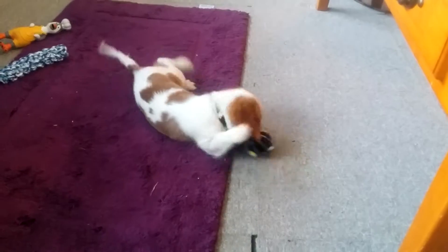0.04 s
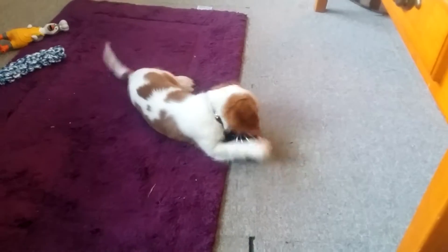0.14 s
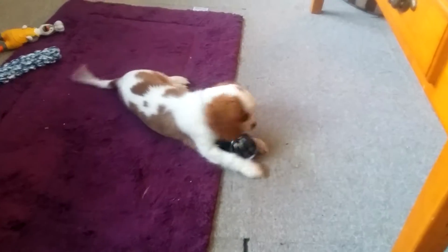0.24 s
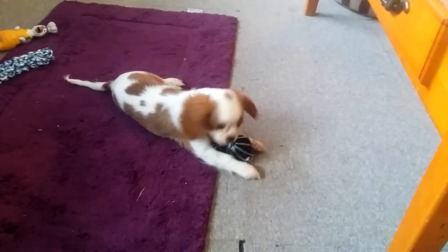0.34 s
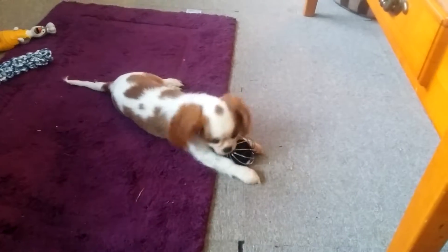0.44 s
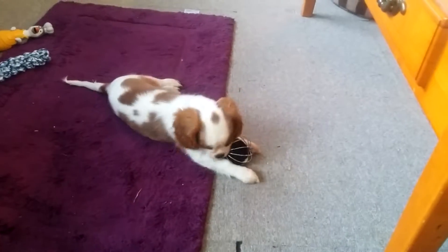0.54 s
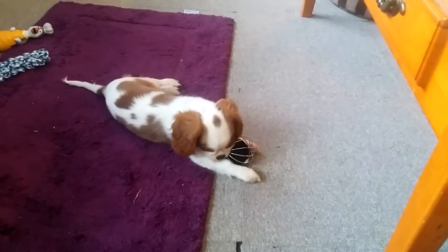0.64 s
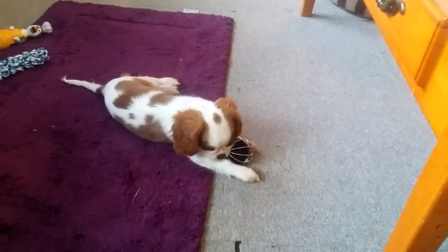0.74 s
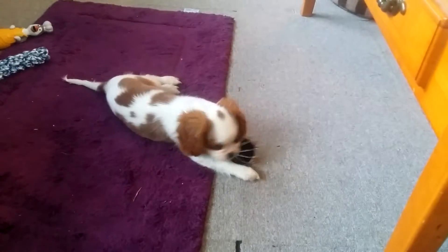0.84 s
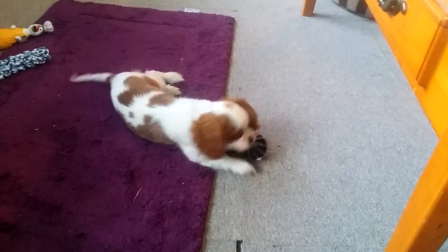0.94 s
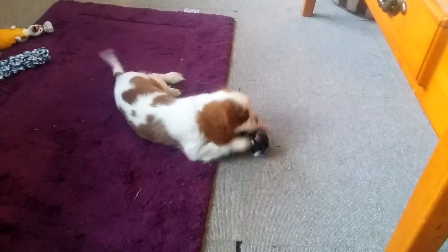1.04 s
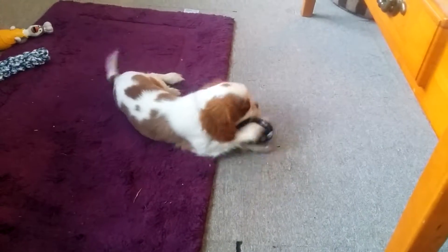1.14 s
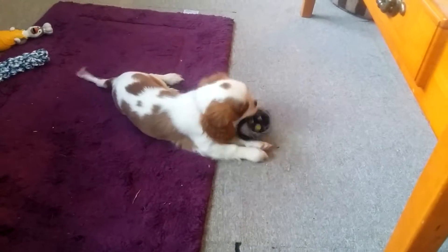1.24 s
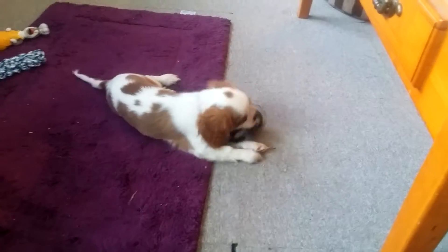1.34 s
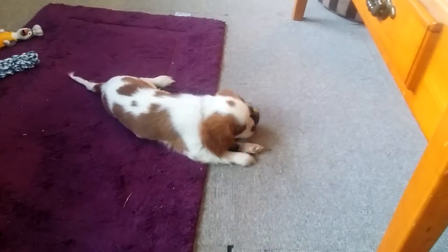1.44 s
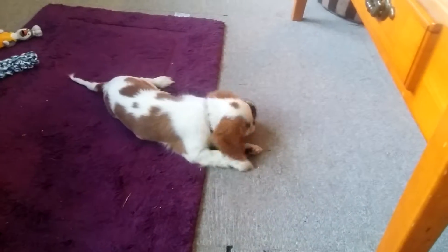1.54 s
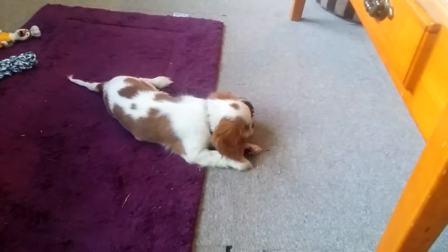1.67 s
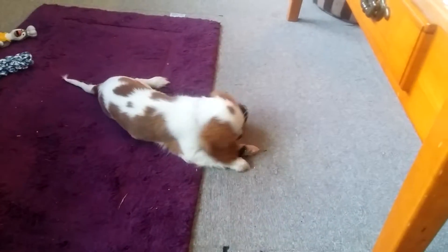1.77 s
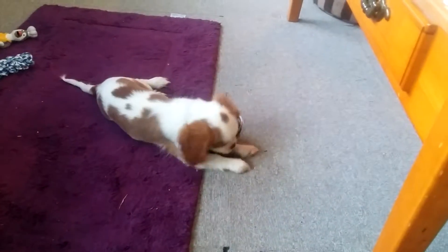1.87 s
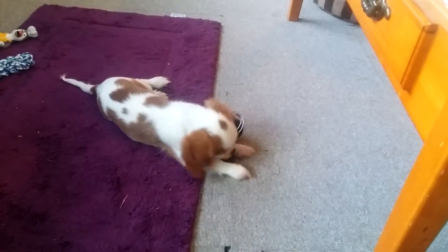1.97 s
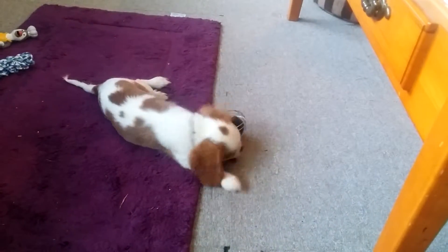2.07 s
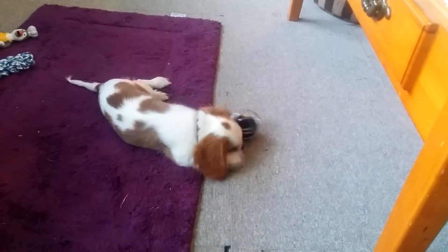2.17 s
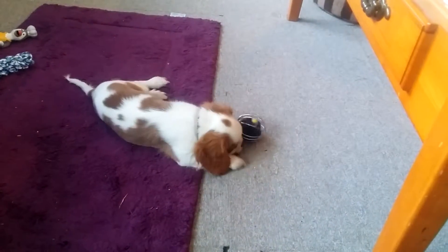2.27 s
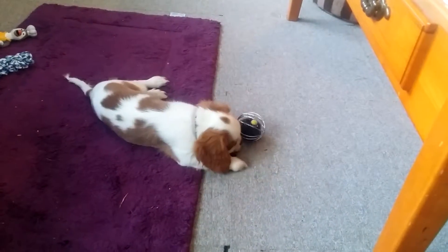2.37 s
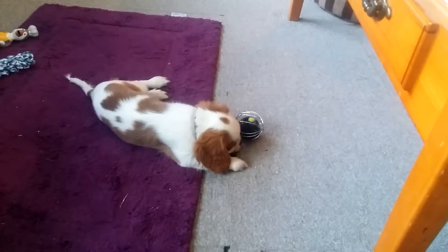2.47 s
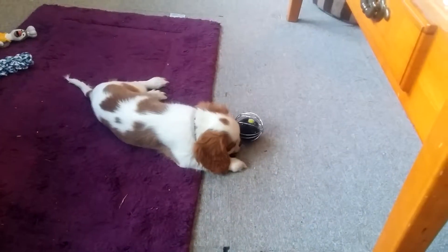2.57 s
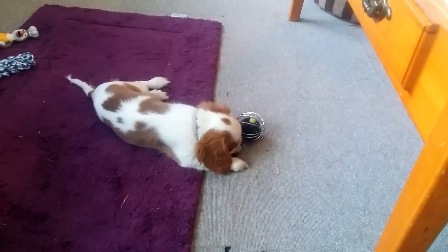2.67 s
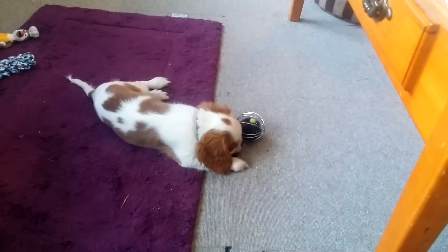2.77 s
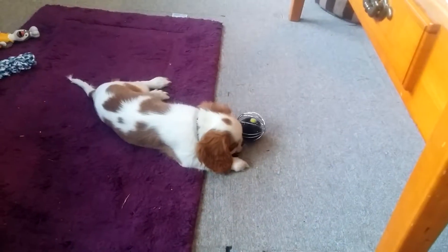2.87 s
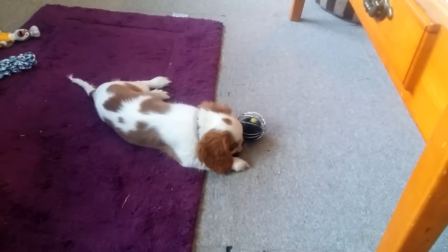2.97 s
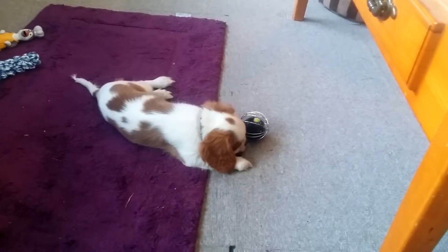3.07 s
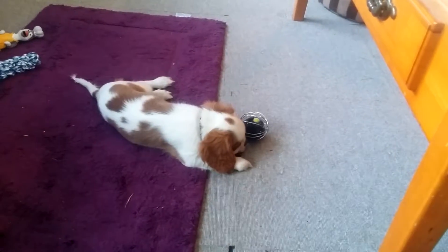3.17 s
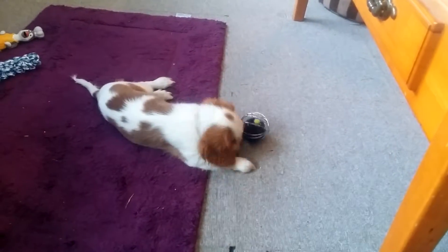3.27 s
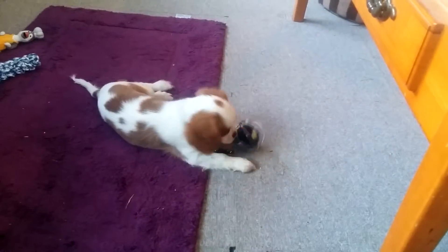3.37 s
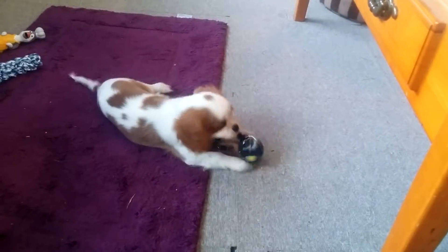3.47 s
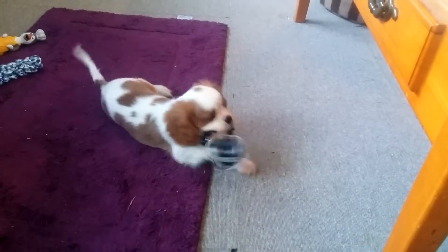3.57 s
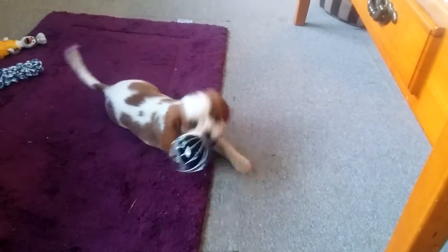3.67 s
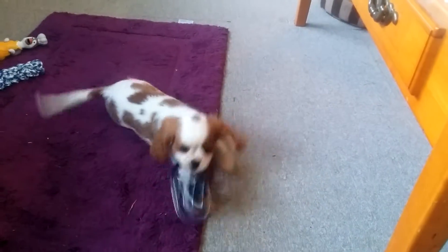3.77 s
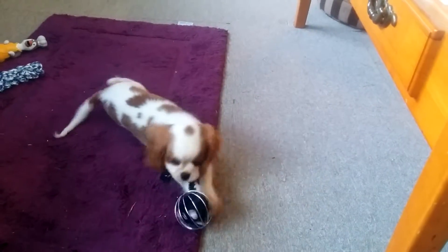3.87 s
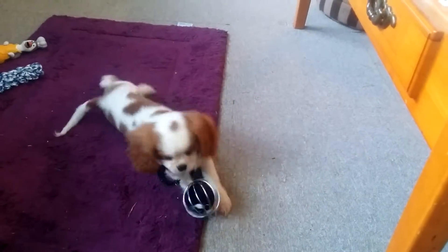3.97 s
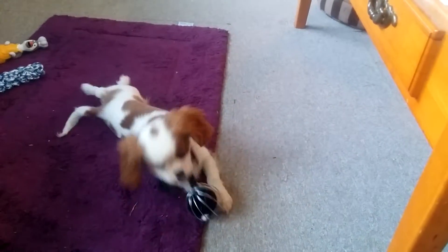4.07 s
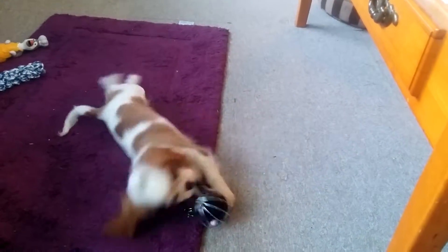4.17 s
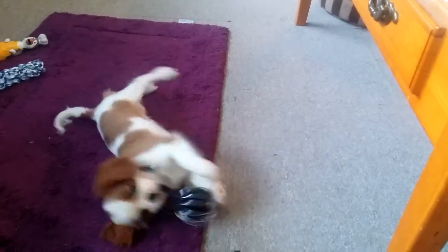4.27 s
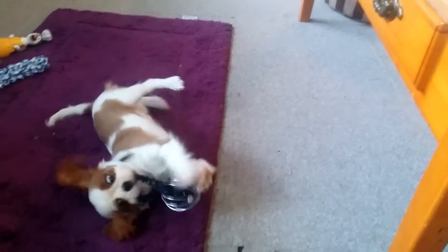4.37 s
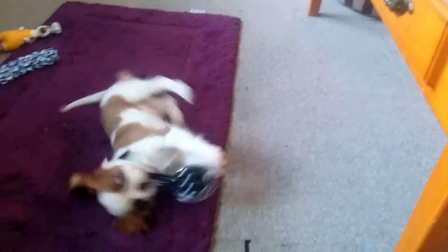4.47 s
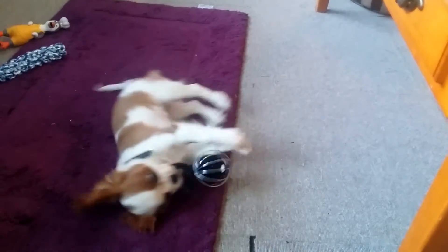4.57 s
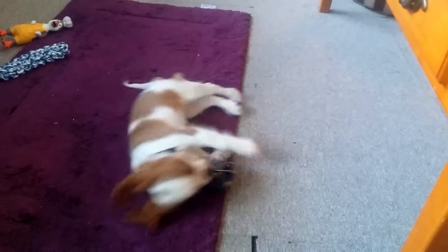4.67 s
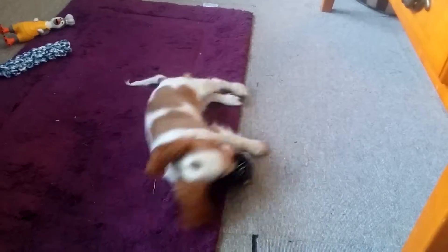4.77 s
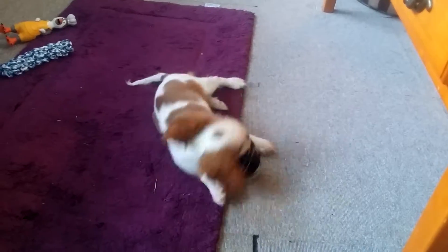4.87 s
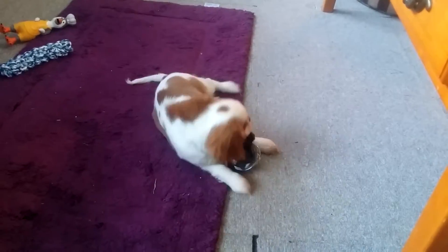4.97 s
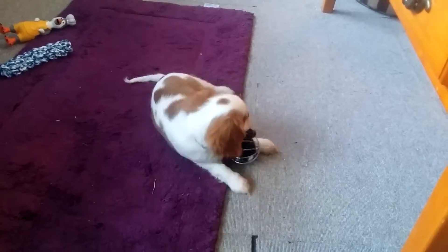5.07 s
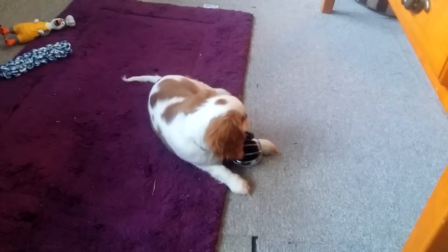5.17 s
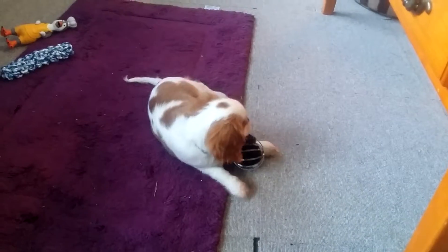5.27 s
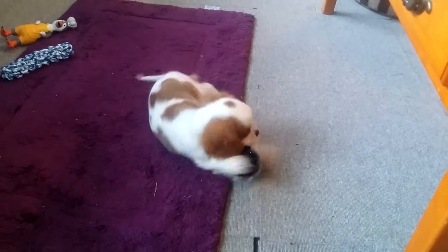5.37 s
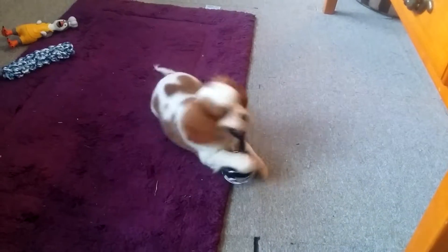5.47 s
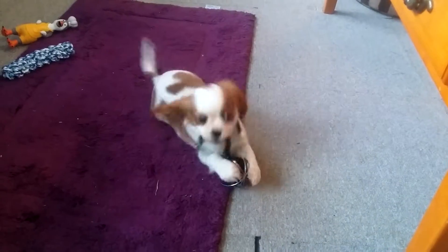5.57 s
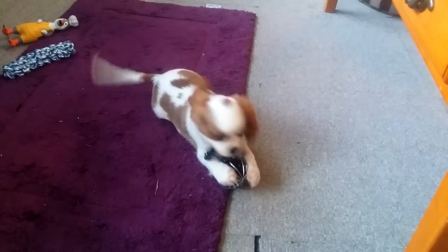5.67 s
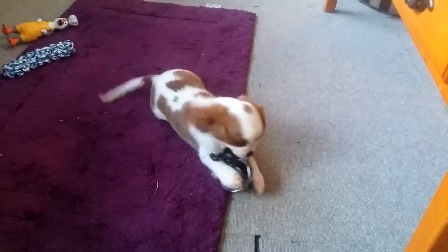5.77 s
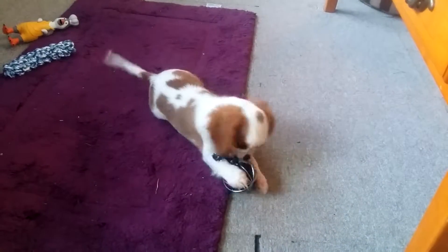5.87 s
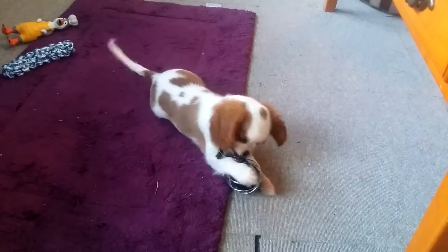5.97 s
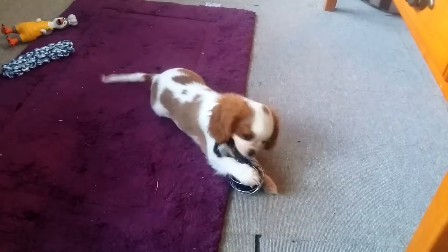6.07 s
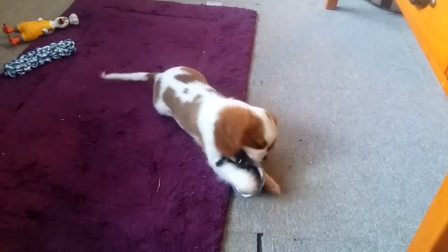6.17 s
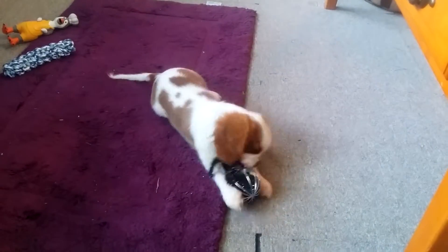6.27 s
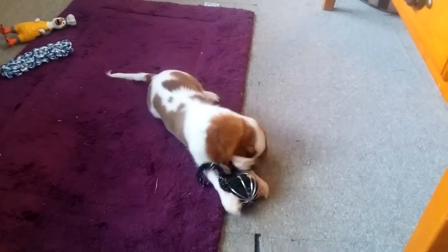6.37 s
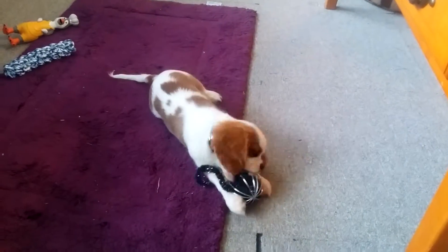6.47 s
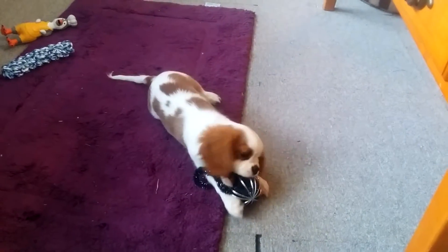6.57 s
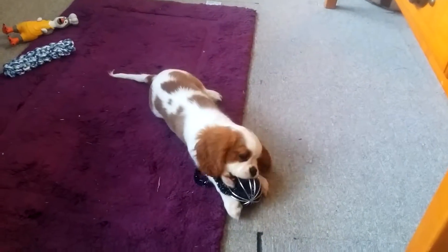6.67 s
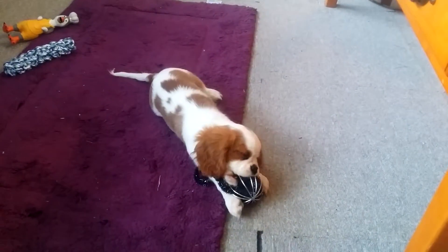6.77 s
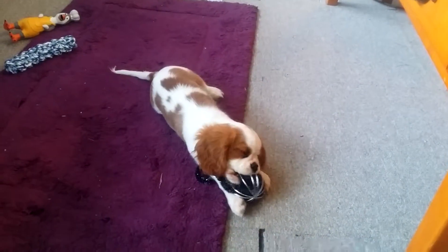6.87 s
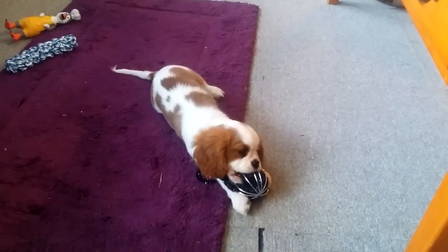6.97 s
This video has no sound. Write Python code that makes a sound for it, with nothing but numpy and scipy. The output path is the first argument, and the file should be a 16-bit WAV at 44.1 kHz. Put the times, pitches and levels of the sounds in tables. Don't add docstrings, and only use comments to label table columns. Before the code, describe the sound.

Loose hard pieces strike a hollow plastic-like shell in crisp high ticks, singly and in swarms. A brief early burst, a pause, a long violent rattle with the loudest crack as the ball lands, then a shorter burst that dies away. Paws scuff and thump softly on carpet; faint chirps and knocks come from elsewhere. Close, dry stereo phone pickup over low house rumble.

```python
import sys
import numpy as np
from scipy import signal
from scipy.fft import rfft, irfft
from scipy.io import wavfile
from scipy.ndimage import uniform_filter1d

SR = 44100
rng = np.random.default_rng(int(sys.argv[2]) if len(sys.argv) > 2 else 0)


def inscribe(sig):
    pcm = np.round(np.clip(np.atleast_2d(sig).T, -1, 1) * 32767)
    wavfile.write(sys.argv[1], SR, pcm.astype(np.int16))


def ratio(d):
    e = np.asarray(d, float) / 20
    return 10 ** e


N = 309395
SHAPE = 256
STEP = 16


def column(table, hz, order):
    table = np.array(table)
    return np.interp(np.log(hz + 1), np.log(table[:, 0]), table[:, order])


def band(lo_hz, hi_hz, channels):
    sos = signal.butter(2, [lo_hz, hi_hz], "band", fs=SR, output="sos")
    noise = signal.sosfilt(sos, rng.standard_normal((channels, N)))
    return noise / noise.std()


def swell(rows, rise_s):
    t = np.arange(0, N, STEP) / SR
    power = np.zeros(len(t))
    for s, db, t60 in rows:
        drop = np.maximum((t - s) / t60, (s - t) / rise_s)
        power += ratio(2 * db - 185.0 * drop)
    return np.repeat(power, STEP)[:N]


def spells(rows, fade_s):
    t = np.arange(0, N, STEP) / SR
    power = np.zeros(len(t))
    for s, hold, db in rows:
        edge = np.minimum(t - s + fade_s, s + hold + fade_s - t) / fade_s
        power += ratio(2 * db) * np.clip(edge, 0, 1) ** 4
    return np.repeat(power, STEP)[:N]


def scatter(at_s, shapes):
    out = np.zeros((2, N + shapes.shape[2]))
    where = (at_s * SR).astype(int)[:, None] + np.arange(shapes.shape[2])
    for k in range(2):
        np.add.at(out[k], where, shapes[k])
    return out[:, :N]


def rings(rows, push_cycles, partner, left_db):
    s, db, hz, t60 = (c[:, None] for c in np.transpose(rows))
    t = np.arange(SR // 3) / SR
    push = 1 - np.exp(-t * hz / push_cycles)
    decay = np.exp(-np.log(1000) * t / np.maximum(t60, .002))
    tone = np.sin(2 * np.pi * hz * t) + 0.44 * np.sin(2 * np.pi * hz * partner * t)
    ring = ratio(db) * push * decay * tone
    return scatter(s[:, 0], np.stack([ring * ratio(left_db), ring]))


def causal(db):
    cepstrum = irfft(db * np.log(10) / 20)
    fold = np.r_[1, 2 * np.ones(SHAPE // 2 - 1), 1, np.zeros(SHAPE // 2 - 1)]
    return irfft(np.exp(rfft(cepstrum * fold)))


# frequency in Hz, left level in dB, right level in dB.
PORT_COLOUR = [(300, -28, -47), (1400, -19.5, -27), (2400, -21, -26.5), (3100, -16.5, -19),
               (3800, -10.5, -11.5), (4600, -9.5, -4), (5350, -8.5, -6.5), (6500, -19.5, -1.5),
               (7500, -18, -4), (8300, -17, -4.5), (9960, -20.5, -10.5), (12000, -23.5, -17.5),
               (15600, -26, -20), (20000, -56, -46)]


def tick_shapes(bright_hz, lift_db=9.0, width=0.25, shell_db=8.5, apart_db=9.0, skirt_db=0.5):
    hz = np.arange(SHAPE // 2 + 1) * SR / SHAPE
    uneven = rng.standard_normal((len(bright_hz), 3, len(hz)))
    uneven = uniform_filter1d(uneven, size=3, axis=2)
    from_bright = (hz + 1) / bright_hz[:, None]
    source = lift_db * np.exp(-(np.log(from_bright) / width) ** 2) + shell_db * uneven[:, 0]
    source = source - skirt_db * np.minimum(np.log2(from_bright) ** 2, 2)
    left = causal(source + column(PORT_COLOUR, hz, order=1) + apart_db * uneven[:, 1])
    right = causal(source + column(PORT_COLOUR, hz, order=2))
    lead_s = .00009 + .00002 * uneven[:, 0, :1]
    left = irfft(rfft(left) * np.exp(2j * np.pi * hz * (lead_s - 8 / SR)))
    right = np.roll(right, 8, axis=1)
    return np.stack([left, right]) / np.abs(right).max(axis=1)[:, None]


# time in seconds, peak in
# dB, brightest frequency in Hz.
SHELL_TICKS = [(0.081, -31, 5700), (0.0982, -31, 7100), (0.0872, -37, 7000), (0.1098, -36, 7200),
               (1.0783, -34, 7500), (1.187, -31.0, 6900), (1.2526, -41, 7000), (1.3141, -28, 7200),
               (1.3268, -35.0, 7000), (1.361, -38.0, 5300), (1.38, -27, 6600), (1.3873, -13.5, 6650),
               (1.3908, -9, 8000), (1.397, -14, 6000), (1.4054, -24.0, 8700), (1.4241, -29.5, 7900),
               (1.434, -27.5, 7100), (1.439, -22.0, 7100), (1.441, -22, 6900), (1.4448, -16, 6600),
               (1.4505, -28, 7200), (1.4538, -25.0, 5900), (1.4577, -24.0, 5300), (1.4702, -24.5, 7200),
               (1.48, -24, 7400), (1.489, -23, 7100), (1.493, -19.5, 7100), (1.5019, -25, 6700),
               (1.505, -26.5, 6900), (1.5137, -19, 6900), (1.5179, -23, 6900), (1.5224, -34, 8400),
               (1.5257, -30.0, 7000), (1.5483, -32, 7000), (1.5523, -29, 7100), (1.557, -34, 7200),
               (1.558, -20.5, 7100), (1.7148, -33, 7200), (1.7232, -32, 6500), (1.9536, -33, 7200),
               (1.9661, -34, 7300), (2.0046, -32, 6600), (2.0565, -37, 6000), (2.0766, -35, 6000),
               (2.18, -45, 4900), (2.1885, -33, 4700), (2.1954, -31, 6500), (2.2347, -35.0, 5300),
               (2.2439, -39, 7100), (2.3103, -25, 6200), (2.3498, -35, 6860), (2.357, -26, 7000),
               (2.5134, -28.5, 7100), (2.5163, -40.5, 7100),
               (3.5996, -36, 7400), (3.6075, -30, 7200), (3.614, -18, 6600), (3.617, -22, 6800),
          (3.625, -11.5, 6640), (3.628, -16, 6800), (3.6351, -18, 6100), (3.6382, -22.5, 6900),
          (3.65, -20, 6900), (3.673, -21, 7500), (3.7035, -28.5, 7500), (3.7418, -15.5, 7550),
          (3.7443, -25, 7800), (3.7507, -28, 6400), (3.7796, -20, 8200), (3.7842, -26, 7100),
          (3.7931, -30, 6800), (3.8107, -24, 7440), (3.8204, -25, 8340), (3.8233, -15, 8600),
          (3.8345, -21, 7600), (3.8587, -29, 6900), (3.863, -23, 7700), (3.8893, -22, 7400),
          (3.9018, -12.5, 6200), (3.904, -16, 6400), (3.9323, 2, 6500), (3.9352, 4, 8450),
          (3.9389, 2, 8200), (3.9414, -4.5, 7000), (3.9463, -11, 7900), (3.9487, -7, 7100),
          (3.95, -4, 6500), (3.9513, -6, 6600), (3.9584, -8, 6600), (3.963, -9, 6900), (3.9657, -14, 7000),
          (3.9697, -6, 7100), (3.9761, -10, 7300), (3.9849, -18, 7800), (3.9873, -11.0, 8700),
          (3.9899, -21, 7400), (3.9923, -4.5, 7550), (3.9166, -26, 6500), (4, -18, 6600),
          (4.0127, -12.5, 7800), (4.0185, -21.5, 7800), (4.0227, -21, 6500), (4.0391, -10.5, 7500),
          (4.044, -15, 7800), (4.0477, -15, 6500), (4.0572, -15, 7840), (4.0604, -7.5, 7040),
          (4.064, -18, 6700), (4.0687, -18.0, 8100), (4.074, -20.0, 6500), (4.0816, -23, 6500),
          (4.0868, -21, 6500), (3.9226, -27, 7200), (4.0965, -28, 6500),
               (4.102, -20, 7460), (4.1188, -23, 6400), (4.138, -18, 7800), (4.1453, -18, 6500),
          (4.158, -26, 6800), (4.164, -12.5, 7540), (4.1666, -24, 7400), (4.1691, -23, 7600),
          (4.1735, -21.0, 8000), (4.1755, -17.5, 7750), (4.2086, -33, 6800), (4.2128, -26.5, 6960),
          (4.2173, -24, 6100), (4.222, -24, 7800), (4.2283, -16, 6840), (4.2338, -28, 7800),
          (4.237, -18, 8050), (4.2399, -28, 6800), (4.257, -25, 6840), (4.259, -24, 7600),
          (4.2634, -24, 6000), (4.2674, -30, 7800), (4.274, -19, 6500), (4.28, -20.5, 5700),
          (4.3039, -30, 7000), (4.307, -29.5, 6500), (4.312, -22, 5700), (4.3301, -14, 6500),
          (4.3324, -23, 7100), (4.3389, -27, 8000), (4.3595, -17, 6300), (4.396, -12, 6500),
          (4.4055, -25, 6500), (4.409, -33, 6500), (4.4151, -32, 7100), (4.4178, -32, 6900),
          (4.4394, -14, 7200), (4.4481, -33, 7800), (4.4622, -32.0, 6400), (4.481, -21.5, 6300),
          (4.4967, -17.5, 7300), (4.5014, -28.0, 5900), (4.5163, -29, 7200), (4.5272, -14, 7200),
          (4.5366, -15, 8140), (4.5398, -15, 7350), (4.5486, -20, 8700), (4.5576, -17.5, 7210),
          (4.5715, -21, 6800), (4.5853, -28.0, 7100), (4.5888, -27, 6600), (4.5937, -11.5, 7000),
          (4.5983, -23.0, 8000), (4.601, -18, 6900), (4.6084, -22, 7100), (4.611, -18, 7100),
          (4.619, -18, 6600), (4.6277, -29, 6500), (4.6426, -30, 7900), (4.6599, -28.5, 8300),
               (4.666, -29.0, 7500), (4.669, -33, 8280), (4.676, -27, 7200), (4.6784, -12.5, 7000),
          (4.6881, -28.5, 6500), (4.6931, -29.5, 6700), (4.7004, -29, 6900), (4.7026, -33.0, 6500),
          (4.7425, -29, 6900), (4.756, -5, 7500), (4.76, -21, 7200), (4.767, -23, 7400),
          (4.7718, -27, 7700), (4.7746, -35, 6000), (4.7813, -34, 6800), (4.7871, -34, 8000),
          (4.7906, -34, 6500), (4.7997, -32, 8400), (4.8036, -18.5, 7000), (4.8084, -13, 6830),
          (4.8142, -19.5, 7100), (4.824, -24, 3900), (4.8266, -29, 7700), (4.8299, -28, 7300),
          (4.8331, -22.5, 6900), (4.8366, -25.0, 7100), (4.8413, -23, 7400), (4.8458, -30.5, 6700),
          (4.8499, -30.0, 7000), (4.852, -32.0, 7900), (4.8611, -31.0, 8300), (4.8904, -16, 7450),
          (4.889, -14, 7500), (4.8946, -17, 7750), (4.8997, -23.0, 7800), (4.9111, -30.5, 7300),
          (4.9176, -21, 7100), (4.921, -23, 6000), (4.9283, -21, 7100), (4.9344, -24.5, 7500),
          (4.94, -23, 5500), (4.944, -17.5, 5500), (4.9512, -27, 7900), (4.9556, -12.5, 7840),
          (4.962, -26, 5200), (4.9668, -25.0, 7400), (4.9759, -20, 7300), (4.98, -15, 7100),
          (4.9884, -32, 6800), (4.9913, -35, 7100), (5.0006, -25, 5570), (5.027, -32, 7300),
          (5.0667, -40.0, 6500), (5.2408, -33, 7500),
               (5.4633, -41.5, 7000), (5.4987, -38, 5900), (5.5102, -31, 7300), (5.5158, -36, 5800),
           (5.5222, -29, 5900), (5.5463, -30, 7800), (5.5494, -20, 8400), (5.5534, -14, 5900),
           (5.557, -7, 8900), (5.5638, -12, 7350), (5.5666, -19, 8100), (5.5727, -22, 6500),
           (5.5805, -9.5, 7500), (5.5861, -12, 7400), (5.5897, -18, 7200), (5.5933, -10.5, 6000),
           (5.6019, -20, 6500), (5.6049, -9.5, 5900), (5.6096, -14, 7600), (5.6119, -20, 7000),
           (5.6185, -33, 6500), (5.6228, -26, 6200), (5.63, -9, 7340), (5.6362, -33, 6400),
           (5.6388, -22.0, 6400), (5.6457, -20, 8400), (5.6491, -25, 7800), (5.6515, -30, 7700),
           (5.6569, -34, 6600), (5.6629, -24, 7500), (5.6658, -31, 6600), (5.672, -27.5, 5900),
           (5.6775, -27, 6500), (5.6817, -36, 7500), (5.6858, -19, 6500), (5.696, -33, 7200),
           (5.7026, -24.0, 7300), (5.7065, -24, 9300), (5.7136, -26, 7500), (5.7157, -19.5, 7100),
           (5.7187, -26, 8000), (5.7227, -35, 6700), (5.7286, -37, 7100), (5.7381, -42, 7000),
           (5.7445, -31.0, 7200), (5.7632, -28, 7500), (5.7661, -26.0, 7950), (5.7749, -36.5, 9900),
           (5.7839, -40.5, 7800), (5.7895, -43, 7100),
               (5.5556, -7.5, 8300),
    (3.9338, -5, 9300),
    (3.9373, -10, 8600),
    (3.9415, -5, 8300),
    (3.9003, -25, 7000),
    (4.7545, -14, 9900),
    (1.3917, -11.5, 9500),
    (3.8937, -25, 7000),
]
TICKS = SHELL_TICKS


def ticks():
    s, db, hz = np.transpose(TICKS)
    shapes = tick_shapes(hz, lift_db=9.5, width=0.17, shell_db=3.5, apart_db=5.0, skirt_db=5.5)
    rise_s = 0.00035
    return scatter(s - rise_s, shapes * ratio(db + 0.67)[:, None])


# time in seconds, level in dB, settling time (92 dB fall) in
# seconds.
JOLTS = [(0.1, -47, 0.24), (1.388, -27, 0.094), (1.442, -35, 0.84), (2.036, -44, 0.91), (2.18, -45.5, 0.8),
         (2.33, -44, 0.33), (2.512, -53, .07), (3.624, -30, 0.41), (3.9, -21.5, 0.051), (3.934, -19, 0.42),
         (4.06, -19, 0.17), (4.676, -31, 0.13), (4.758, -18.5, 0.044), (4.985, -44, 0.26),
         (5.554, -45, 1.4)]
# start in seconds, length in seconds, level in dB.
TURNING = [(0.0, 0.19, -49), (1.172, 0.0177, -43), (1.225, .035, -45.5), (1.29, 0.038, -43.5),
           (2.002, 0.022, -39.5), (3.5, 0.12, -51.5), (3.67, 0.054, -44), (3.76, 0.11, -37),
           (4.1, 0.07, -35.5), (4.22, 0.059, -36), (4.3, 0.228, -42.5), (4.52, 0.18, -39.5),
           (4.8, 0.073, -41.5), (4.89, 0.086, -40), (5.39, 0.075, -49), (6.4, 0.46, -62)]


def swarms():
    rate_hz, scatter_db, swarm_db = 2300, 3.0, -4.5
    bounce_t60_s, bounce_db = 0.076, -21.5
    count, kind_count = 30000, 300
    at_s = np.cumsum(-np.log(1 - rng.random(count))) / rate_hz
    at_s = at_s[at_s < N / SR]
    spread = np.clip(rng.standard_normal(len(at_s)), -3, 2.2)
    size = ratio(scatter_db * spread) * np.sign(rng.random(len(at_s)) - .5)
    bright_hz = 5600 * (8600 / 5600) ** rng.random(kind_count)
    kinds = tick_shapes(bright_hz)[:, :, :SHAPE // 2]
    pick = (rng.random(len(at_s)) * kind_count).astype(int)
    dense = scatter(at_s, kinds[:, pick] * size[:, None])
    s, db, _ = np.transpose(TICKS)
    blows = np.bincount((s * SR).astype(int), ratio(db + bounce_db) ** 2, N)
    settling = signal.lfilter([1], [1, -ratio(-120 / (bounce_t60_s * SR))], blows)
    moving = swell(JOLTS, rise_s=0.03) + spells(TURNING, fade_s=0.035)
    return dense / dense[1].std() * np.sqrt(moving * ratio(2 * swarm_db) + settling)


# time in seconds, peak in dB, ring in Hz, t60 in seconds.
HOLLOW = [(1.4415, -26, 4480, 0.0058), (1.445, -21.5, 3340, 0.0023), (1.513, -36, 4120, 0.0102),
          (3.622, -31, 2120, 0.003), (3.938, -30, 2150, 0.012), (4.164, -31.5, 2380, 0.0058),
          (4.57, -36.5, 1510, 0.0086), (4.756, -28.5, 2280, 0.0017), (4.7565, -35, 3387, 0.011),
          (4.7575, -20, 4600, 0.007), (4.824, -23, 3800, 0.0048), (5.5635, -30, 3960, 0.0067),
          (5.593, -27, 4700, 0.0065), (5.6098, -28, 4000, .005), (4.396, -32, 2930, 0.0036),
          (5.686, -26, 3480, 0.0071), (5.702, -34, 3296, 0.0067), (5.715, -34.5, 3600, 0.0063),
          (6.045, -41, 4050, 0.0031), (6.44, -55, 3464, 0.0177)]


def hollow_knocks():
    return rings(HOLLOW, push_cycles=0.5, partner=1.38, left_db=-0.5)


# time in seconds, peak in dB, ring in Hz, t60 in seconds.
DULL_KNOCKS = [(1.332, -38, 487, 0.017), (2.3565, -37, 4600, 0.0037), (1.379, -35, 517, 0.013),
               (3.598, -39.5, 530, 0.0089), (3.899, -46, 430, 0.013), (4.137, -38, 591, 0.0095),
               (4.3325, -35.5, 746, 0.009), (5.5632, -38, 940, 0.008), (5.0, -45, 885, 0.0116),
               (5.342, -39, 543, 0.0064), (5.5165, -32.5, 505, 0.011)]


def dull_knocks():
    return rings(DULL_KNOCKS, push_cycles=0.23, partner=1.49, left_db=3.5)


# time in seconds, peak in dB, pressure leak in seconds.
SNAPS = [
    (4.3317, -21.5, 0.00029),
    (1.4412, -25.5, 0.00014),
    (4.4, -37, .0003),
]


def snaps():
    s, db, leak_s = (c[:, None] for c in np.transpose(SNAPS))
    t = np.arange(SHAPE) / SR
    leak = np.exp(-t / leak_s) - 0.21 * np.exp(-t / (3.3 * leak_s))
    pull = (1 - np.exp(-t / .00006)) * leak
    return scatter(s[:, 0], np.stack([-ratio(db + 5.0) * pull, -ratio(db) * pull]))


# time in seconds, peak in dB, floor ring in Hz, t60 in seconds.
THUDS = [(1.191, -34, 68, 0.17), (1.331, -20.5, 73, 0.034), (1.347, -33, 31.44, 0.39),
         (1.378, -24, 102, 0.069), (3.655, -33, 44.3, 0.28), (3.919, -20, 113.7, 0.12),
         (3.93, -33, 34.2, 0.61), (4.55, -38, 31, 0.3), (4.742, -30.5, 96, 0.15), (4.76, -37, 30.2, 0.62),
         (5.514, -31.5, 102, 0.17)]


def thuds():
    return -rings(THUDS, push_cycles=0.47, partner=1.25, left_db=1.5)


# time in seconds, level in dB, fall time (92 dB) in
# seconds.
LURCHES = [(0.06, -47.5, 0.34), (.27, -49, 0.98), (1.21, -51, .6), (1.39, -41, 0.5), (3.13, -52, 0.86),
           (3.67, -51.5, 2.9), (3.96, -40.5, 1.14), (4.28, -47, 1.1), (4.57, -53, 1.5), (4.76, -48.5, 1.5),
           (5.3, -53, 0.64), (5.55, -47.5, 3.3)]
# time in seconds, level in dB, fall time (92 dB) in seconds.
SCUFFS = [
    (.014, -53, 0.13),
    (.04, -47.5, 0.089),
    (.066, -49, 0.19),
    (1.345, -65.5, 0.59),
    (1.465, -60, .05),
    (3.936, -50, 0.048),
    (5.52, -48.5, 0.11),
]


def shuffle():
    boards_db = -55.5
    boards_power = swell(LURCHES, rise_s=0.5) + ratio(2 * boards_db)
    mid, side = band(12.0, 144.0, channels=2) * np.sqrt(boards_power)
    brush, apart = band(330, 930, channels=2) * np.sqrt(swell(SCUFFS, rise_s=0.25)) * ratio(-1.5)
    sides = np.array([[1], [-1]])
    boards = mid * ratio(0.59 * sides) + 0.14 * side * sides
    return boards + brush + 0.35 * apart * sides


def room(x, far_db, early_db, early_t60_s):
    late_t60_s, late_db = 0.3, -10.5
    t = np.arange(SR // 2) / SR
    echoes = rng.standard_normal((2, 2, len(t))) * np.minimum(t / .001, 1)
    early = np.exp(-np.log(1000) * t / early_t60_s)
    late = np.exp(-np.log(1000) * t / late_t60_s)
    tail = ratio(early_db) * echoes[0] * early / np.linalg.norm(early)
    tail = tail + ratio(late_db + far_db) * echoes[1] * late / np.linalg.norm(late)
    return x + signal.fftconvolve(x, tail, axes=1)[:, :N]


# time in seconds, peak in dB, ring in Hz, t60 in seconds.
FAR_KNOCKS = [
    (2.806, -42.5, 720, 0.1),
    (2.836, -44, 800, 0.033),
    (6.62, -35.5, 855, 0.028),
    (6.621, -48, 2100, .012),
]


def far_knocks():
    return rings(FAR_KNOCKS, push_cycles=3.1, partner=1.06, left_db=-3.0)


# time in seconds, peak in dB.
CHIRPS = [
    (0.2572, -50.5),
    (1.857, -50),
    (5.46, -52),
]


def chirps():
    from_hz, to_hz, fall_s, length_s = 2900, 1550, .0024, .0105
    echo_s, echo_db = .0165, -5.5
    s, db = np.transpose(CHIRPS)
    t = np.arange(SR // 20) / SR
    hz = to_hz + (from_hz - to_hz) * np.exp(-t / fall_s)
    swelling = np.sin(np.pi * np.minimum(t / length_s, 1) ** .42)
    note = np.sin(2 * np.pi * np.cumsum(hz) / SR) * swelling
    again = np.arange(5)
    size = ratio(db[:, None] + echo_db * again).ravel()
    at_s = (s[:, None] - .003 + echo_s * again).ravel()
    return scatter(at_s, np.stack([size[:, None] * note] * 2))


# time in seconds, level in dB.
WHISTLE = [(0.0, -64), (0.35, -86.5), (0.58, -70.5), (1.5, -61.5), (3.58, -62), (4.12, -57), (4.34, -60),
           (4.85, -60), (5.04, -62), (5.57, -61), (5.74, -78), (6.47, -74), (6.66, -67), (7.02, -66)]


def whistle():
    s, db = np.transpose(WHISTLE)
    level = ratio(np.interp(np.arange(N) / SR, s, db, left=-120, right=-120))
    hiss = band(2780, 3670, channels=1)[0] * level * ratio(5.5)
    return np.array([hiss, 0.07 * hiss])


# frequency in Hz, left and right level in dB per Hz, likeness of ports from 0 to 1.
HOUSE = [(19.6, -63, -67, 0.87), (50, -70, -71.5, 0.92), (155, -82, -82.5, 0.78), (345, -86, -86, 0.71),
         (980, -90, -91, 0.08), (2070, -94.5, -96.5, 0), (2540, -94.5, -95.5, 0.03), (3180, -88, -100, 0),
         (3600, -90.5, -99, 0), (5140, -91.5, -99, 0.05), (6500, -87, -96, 0.01), (8000, -92.5, -100, 0.01),
         (12400, -100, -104, 0), (16400, -103, -106, 0.3)]


def house():
    hz = np.arange(N // 2 + 1) * SR / N
    like = np.clip(column(HOUSE, hz, order=3), 0, 1)
    shared, *own = rfft(rng.standard_normal((3, N)))
    ports = []
    for k in range(2):
        blend = np.sqrt(like) * shared + np.sqrt(1 - like) * own[k]
        ports.append(blend * ratio(column(HOUSE, hz, order=k + 1)))
    return irfft(np.array(ports) * np.sqrt(SR / 2) * (hz > 12), N)


def scene():
    ball = room(ticks() + swarms(), far_db=0.1, early_db=-7, early_t60_s=.007)
    knocks = room(hollow_knocks() + dull_knocks(), far_db=9.0, early_db=-2, early_t60_s=0.066)
    near = ball + knocks + snaps() + thuds() + shuffle()
    far = room(far_knocks(), far_db=5, early_db=-4, early_t60_s=0.14)
    far = far + room(chirps(), far_db=13, early_db=3.5, early_t60_s=0.23)
    return near + far + whistle() + house()


def top_cut(x):
    return signal.sosfilt(signal.butter(12, 16330, fs=SR, output="sos"), x)


def record(dry):
    cut = signal.ellip(8, .2, 30, 15750, fs=SR, output="sos")
    mix = signal.sosfilt(cut, np.clip(dry, -.92, .92))
    return top_cut(mix)


dry = scene()
out = record(dry)
inscribe(out)
```